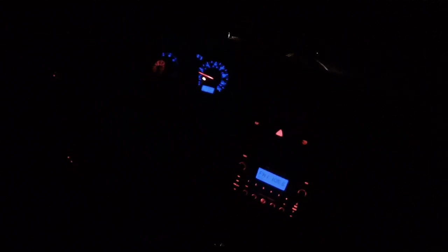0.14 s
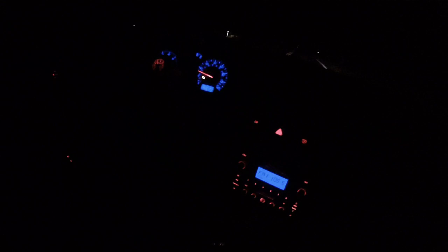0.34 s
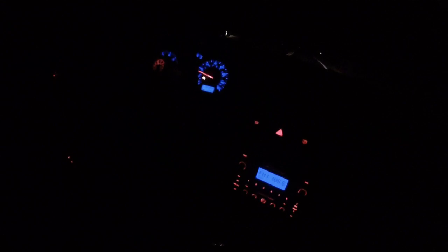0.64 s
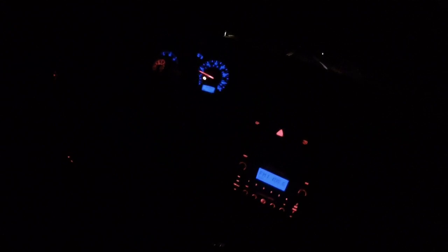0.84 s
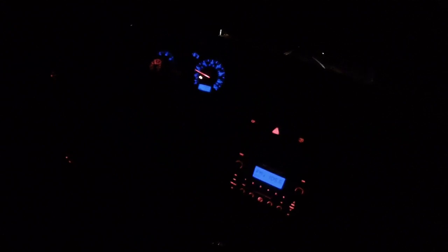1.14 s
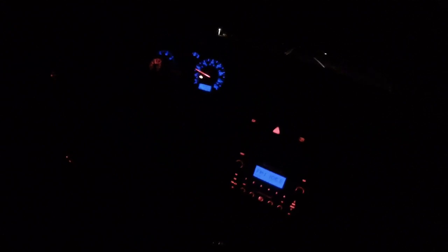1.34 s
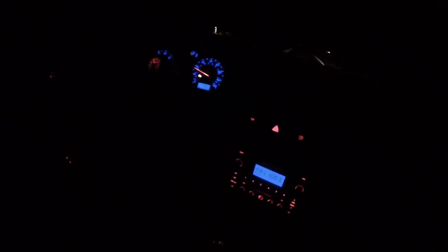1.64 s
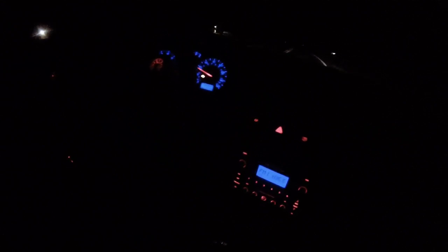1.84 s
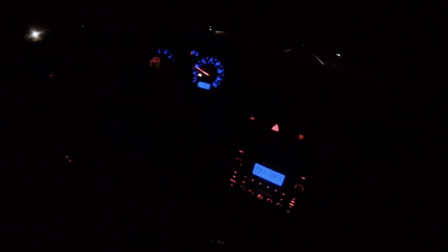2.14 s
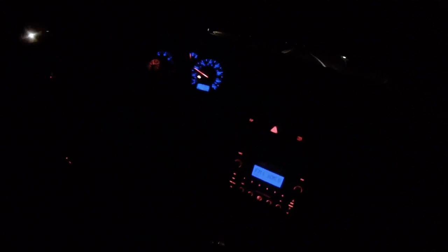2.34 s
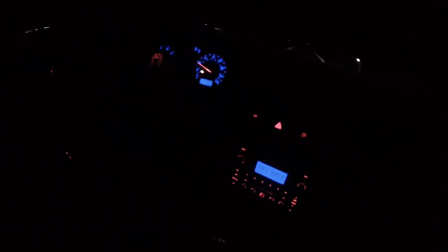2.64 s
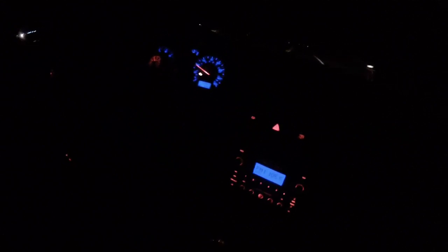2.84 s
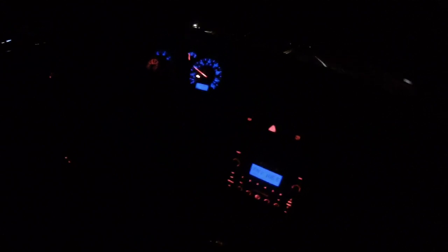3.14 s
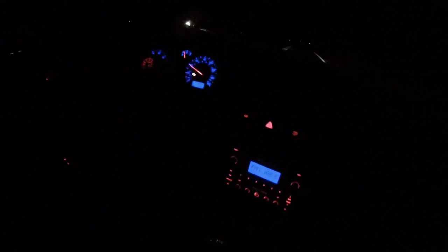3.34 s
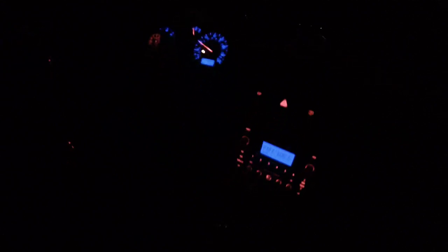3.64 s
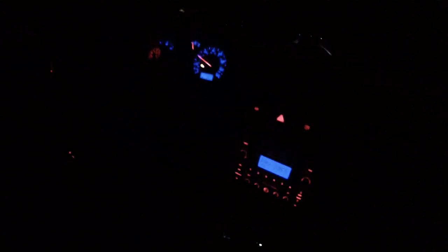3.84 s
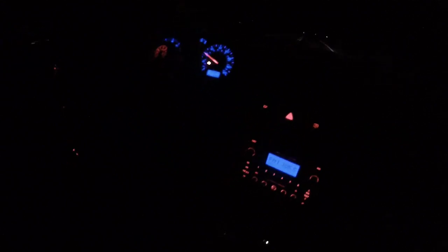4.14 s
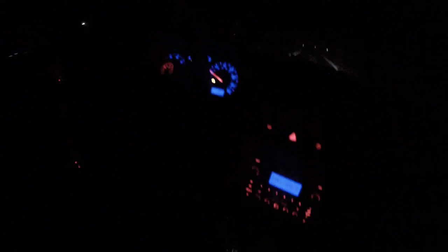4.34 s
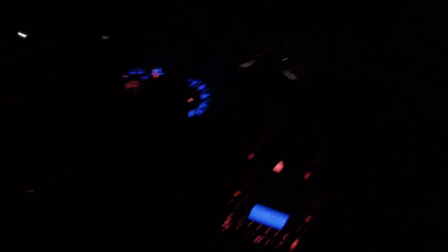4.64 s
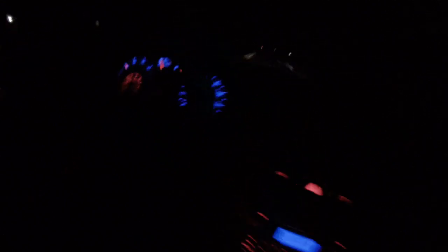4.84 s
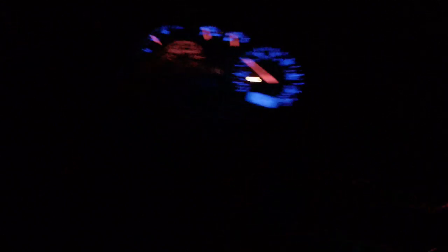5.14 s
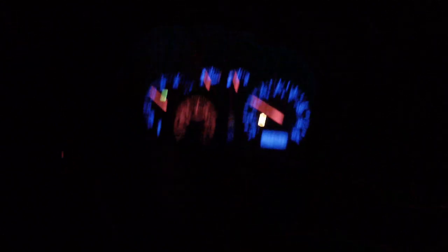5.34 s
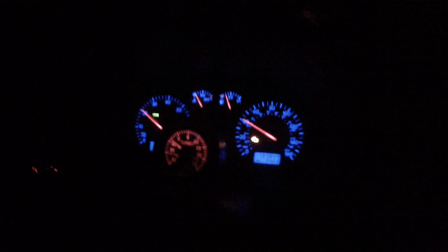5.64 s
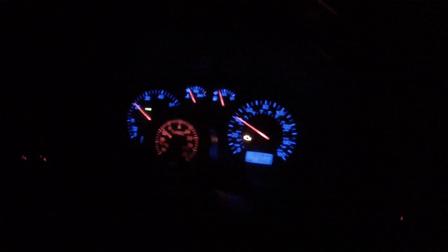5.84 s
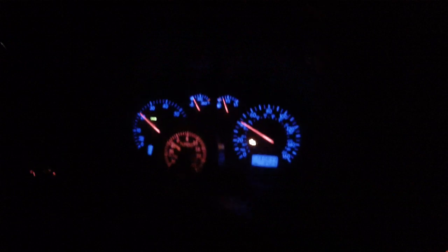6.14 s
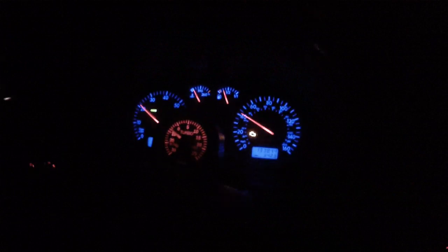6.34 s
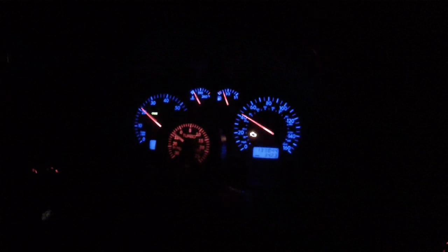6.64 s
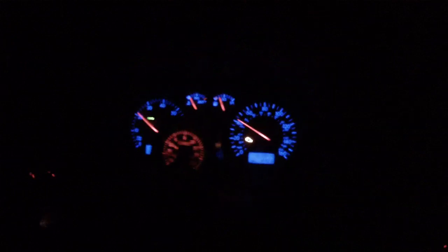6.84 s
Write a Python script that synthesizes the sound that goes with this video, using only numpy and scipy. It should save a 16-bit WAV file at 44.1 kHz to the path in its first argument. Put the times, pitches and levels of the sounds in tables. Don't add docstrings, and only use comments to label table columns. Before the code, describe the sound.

Inside a car at night, a deep booming engine climbs steadily, drops out for a gear change, then pulls again over tyre rumble and air hiss.

```python
import sys
import numpy as np
from scipy import signal
from scipy.fft import rfft, irfft
from scipy.io import wavfile
from scipy.ndimage import uniform_filter1d

SR = 44100
rng = np.random.default_rng(int(sys.argv[2]) if len(sys.argv) > 2 else 0)


def decibels_to_gain(level_db):
    exponent = np.asarray(level_db, float) / 20
    return 10 ** exponent


def store_pcm(level_fs):
    pcm = np.round(np.clip(level_fs, -1, 1) * 32767).astype(np.int16)
    wavfile.write(sys.argv[1], SR, np.atleast_2d(pcm).T)


N = 307818


def evened(x):
    return x / np.sqrt(np.mean(x ** 2) + 1e-20)


def columns(rows, t):
    s, *values = np.transpose(rows)
    return [np.interp(t, s, v) for v in values]


def read(points, hz):
    f, db = np.transpose(points)
    return np.interp(np.log(hz + 1), np.log(f + 1), db, left=-90, right=-90)


def wander(rate_hz):
    spectrum = rfft(rng.standard_normal(N))
    lowpass = 1 + (np.fft.rfftfreq(N, 1 / SR) / rate_hz) ** 2
    return evened(irfft(spectrum / lowpass, N))


def noise(colours, share, size, patchy_db):
    hop = size // 4
    hz = np.fft.rfftfreq(size, 1 / SR)
    frames = N // hop + 5
    a, b, patches = rng.standard_normal((frames, len(hz), 3)).T
    patches = uniform_filter1d(patches, size=8, axis=0)
    patches = evened(uniform_filter1d(patches, size=8, axis=1))
    mix = np.interp(np.arange(frames) * hop, np.arange(N), share * np.ones(N))
    mix = np.clip(mix, 0, 1)
    first, second = (evened(decibels_to_gain(read(c, hz)))[:, None] for c in colours)
    colour = (1 - mix) * first + mix * second
    z = (a + 1j * b) * colour * decibels_to_gain(patchy_db * patches)
    return evened(signal.istft(z, nperseg=size, noverlap=size - hop)[1][:N])


def engine(t):
    # (time [s], boom pitch [Hz], throttle [dB], exhaust pressure [dB re full])
    course = [(0, 66.1, 1.5, 0.5), (0.8, 70.25, 0, 0), (1.55, 74.96, 0, 0.5), (2.3, 79.55, -0.5, 0),
              (3.0, 84, -0.5, 0), (3.33, 85.2, 1.5, -3), (3.45, 82.5, -18, -6), (3.62, 78.4, -11, -9),
              (4.05, 66.32, -9.5, -24.5), (4.09, 66.3, -3, -7.5), (4.165, 67, -11, -4), (4.225, 73, -6, -8),
              (4.28, 68.2, -5, -6), (4.34, 68.1, -1, 0.5), (4.75, 68.2, -1, -2.5), (5.5, 70.06, -1, -5.5),
              (6.3, 71.96, -1, -3.5), (6.98, 73.6, -3, -8.5)]
    # (frequency [Hz], level [dB])
    boom_response = [(60, -13.5), (70, -11), (78, -14), (92, -17.5), (125, -6), (136, -8), (150, -13.5),
                     (180, -23)]
    # (frequency [Hz], level [dB])
    third_response = [(185, -36.5), (205, -29.5), (218, -23), (230, -25.5), (240, -34), (252, -28.5),
                      (270, -29)]
    # (frequency [Hz], gain [dB])
    cabin_lift = [(90, -3.5), (250, 3.5), (340, -5), (400, 4), (470, 4), (560, -7.5), (800, -8)]
    # (multiple of boom pitch [1], level [dB])
    upper_orders = [(1.5, -0.5), (4, 0.5), (4.5, -18.5), (5, -8), (5.5, -10.5), (6, -15), (7, -16),
                    (8, -15.5)]

    hz, throttle_db, exhaust_db = columns(course, t)
    turn = 2 * np.pi * np.cumsum(hz) / SR - 0.9
    load_db = -32 + 1.4 * throttle_db + 0.7 * exhaust_db
    orders = [
        (1, read(boom_response, hz) + throttle_db),
        (2, read(boom_response, 2 * hz) + exhaust_db),
        (3, read(third_response, 3 * hz) + throttle_db + 0.2 * exhaust_db),
    ]
    orders += [(k, load_db + db + read(cabin_lift, k * hz)) for k, db in upper_orders]

    out = 0
    for k, db in orders:
        uneven = 1 + 0.022 * np.sqrt(k) * (wander(rate_hz=6) + 1j * wander(rate_hz=6))
        lead = 1.4 * (k == 2)
        swing = (uneven * np.exp(1j * (k * turn + lead))).real
        out = out + np.sqrt(2) * decibels_to_gain(db) * swing
    return out, turn, hz


def rumble():
    # (frequency [Hz], level [dB per Hz])
    rumble_colour = [(8, -27.5), (16, -9), (24, 3.5), (34, -4), (45, -1), (70, -26.5)]
    return decibels_to_gain(-22.5) * noise([rumble_colour, rumble_colour], 0, size=8192, patchy_db=-1.5)


def drone(pace_db):
    # (frequency [Hz], level [dB per Hz])
    drone_colour = [(30, -20.5), (45, -14), (60, 0), (90, -8.5), (105, -2), (125, 3), (150, -5), (175, -10),
                    (220, -27)]
    level_db = -24 + 0.99 * pace_db
    return decibels_to_gain(level_db) * noise([drone_colour, drone_colour], 0, size=4096, patchy_db=0.7)


def roar(pace_db):
    # (frequency [Hz], level [dB per Hz])
    roar_colour = [(120, -31.5), (170, -0.5), (205, 5.5), (240, 5.5), (280, 1.5), (330, -2), (430, -2),
                   (550, -7.5), (700, -6.5), (800, -27.5), (1000, -30.5), (1500, -52)]
    return decibels_to_gain(-29 + pace_db) * noise([roar_colour, roar_colour], 0, size=2048, patchy_db=0.5)


def air(t, turn, hz, pace_db, openness):
    # (frequency [Hz], level [dB per Hz])
    shaded_colour = [(440, -29.5), (750, -3.5), (795, 0.5), (904, -16.5), (1020, -2), (1140, -11),
                     (1240, -11), (1330, -14), (1450, -10.5), (2020, -13), (2270, -14.5), (3000, -10),
                     (3500, -20.5), (4550, -56), (7700, -120)]
    # (frequency [Hz], level [dB per Hz])
    open_colour = [(440, -24), (750, -3), (785, -7), (887, -8.5), (958, -5), (1040, -12.5), (1220, -4.5),
                   (1520, -3), (1800, -6.5), (2160, -8.5), (2670, -13.5), (2870, -14), (3500, -20.5),
                   (4550, -50), (7700, -120)]
    # (frequency [Hz], level [dB per Hz])
    fizz_colour = [(2060, -32), (3500, -7), (4030, 0), (4330, -4), (4810, -4), (6000, -14.5), (7800, -47),
                   (13200, -120)]

    throb = 1 + 0.041 * np.cos(turn) + 0.067 * wander(rate_hz=10)
    hiss_db = -44.5 + 0.77 * pace_db + 3.5 * openness
    hiss = decibels_to_gain(hiss_db) * noise([shaded_colour, open_colour], openness, size=1024, patchy_db=0.6)
    fizz_db = -54 + 0.15 * pace_db + 5.5 * openness
    fizz_db = fizz_db + 0.094 * (hz - 70) - 0.6 * t
    fizz = decibels_to_gain(fizz_db) * noise([fizz_colour, fizz_colour], 0, size=512, patchy_db=0.8)
    return throb * (hiss + fizz)


def bumps(t):
    # (time [s], pitch [Hz], level [dB])
    bump_events = [(0.031, 27, -19.5), (0.53, 29, -23.5), (0.69, 28, -20), (0.9, 27, -20), (1.3, 24, -22),
                   (1.71, 26.01, -17), (1.9, 25, -18), (2.13, 25, -15), (2.27, 27.2, -14.5),
                   (2.62, 26.8, -14), (3.19, 27, -8.5), (3.33, 31.2, -17), (3.49, 29.99, -17.5),
                   (3.701, 22.6, -18), (3.88, 23, -17), (4.02, 26, -15.5), (4.68, 28, -16), (4.9, 27, -17),
                   (5.13, 27.5, -20), (5.41, 27.96, -17), (5.55, 23, -14), (5.71, 22, -12.5),
                   (6.0, 25, -13), (6.32, 29.02, -14.5), (6.45, 28, -15), (6.58, 26.99, -16),
                   (6.69, 24.9, -14), (6.82, 25, -18)]
    rise_s, fall_s = 0.06, 0.083
    out = np.zeros(N)
    sway = 0.4 * wander(rate_hz=10)
    for s, hz, db in bump_events:
        near = slice(max(round((s - 0.3) * SR), 0), round((s + 0.4) * SR))
        since = t[near] - s
        u = since / np.where(since < 0, rise_s, fall_s)
        swing = np.cos(2 * np.pi * hz * since + sway[near])
        out[near] += np.sqrt(2) * decibels_to_gain(db) * np.exp(-u ** 2) * swing
    return out


def road(t, turn, hz):
    # (time [s], road pace [dB re start], microphone facing the open air [0-1])
    drive = [
        (0, -0.5, 0),
        (1.0, 1, 0.14),
        (2.4, 4, 0.04),
        (3.2, 4, .1),
        (4.1, 2, .2),
        (4.6, 3, 0.4),
        (5.1, 2.5, 0.8),
        (5.6, 2.5, .8),
        (6.3, 4, .8),
        (6.98, 4, 0.7),
    ]
    pace_db, openness = columns(drive, t)
    low = rumble() + drone(pace_db) + bumps(t)
    return low + roar(pace_db) + air(t, turn, hz, pace_db, openness)


def crickets():
    # (time [s], length [s], first pitch [Hz], level [dB])
    chirps = [(0.82, 0.2, 5680, -64), (0.83, 0.16, 5490, -63), (0.97, 0.1, 5200, -64),
              (1.04, 0.14, 5470, -63), (1.283, 0.1, 5640, -64), (1.436, 0.02, 5600, -61),
              (1.6, 0.3, 5640, -68), (6.465, 0.062, 5560, -61), (6.541, 0.019, 5540, -60),
              (6.56, 0.038, 5520, -53), (6.598, 0.058, 5500, -58), (6.582, 0.06, 5300, -57)]
    pulses_per_s, sink_hz_per_s = 52, 300
    out = np.zeros(N)
    blur = 0.7 * wander(rate_hz=40)
    for s, length, hz, db in chirps:
        t = np.arange(round(length * SR)) / SR
        at = round(s * SR)
        phase = 2 * np.pi * np.cumsum(hz - sink_hz_per_s * t) / SR
        tone = np.sin(phase + blur[at:at + len(t)])
        pulses = np.sin(np.pi * pulses_per_s * t) ** 2
        out[at:at + len(t)] += decibels_to_gain(db) * evened(tone * pulses)
    return out


def trim():
    # (time [s], length [s], ring pitch [Hz], ring width [Hz], level [dB])
    buzz_events = [(1.175, 0.035, 3000, 150, -49), (1.265, 0.055, 3960, 110, -55),
                   (1.36, 0.06, 4030, 100, -63), (1.43, 0.045, 4100, 200, -53),
                   (1.42, 0.055, 2950, 300, -51), (3.845, 0.0012, 5000, 450, -40),
                   (4.68, 0.06, 3900, 500, -55), (4.982, 0.04, 3820, 170, -43),
                   (5.024, 0.024, 4020, 180, -44), (5.045, 0.047, 3850, 150, -43),
                   (4.972, 0.04, 2850, 200, -46), (5.03, 0.038, 2850, 150, -44),
                   (4.985, 0.095, 2250, 400, -48), (4.98, 0.1, 1450, 700, -41),
                   (4.98, 0.11, 4700, 800, -52), (6.305, 0.03, 4000, 300, -53),
                   (6.58, 0.03, 3950, 200, -53), (6.76, 0.03, 4000, 500, -54)]
    throbs_per_s = 36
    out = np.zeros(N)
    t = np.arange(1500) / SR
    for s, length, hz, width, db in buzz_events:
        at = round(s * SR)
        rub = rng.standard_normal(round(length * SR))
        rub = rub * (1 + np.sin(np.pi * throbs_per_s * np.arange(len(rub)) / SR) ** 2)
        ring = t * np.exp(-2 * np.pi * width * t) * np.sin(2 * np.pi * hz * t)
        buzz = signal.fftconvolve(rub, ring)
        level = decibels_to_gain(db) * np.sqrt(len(rub) / np.sum(buzz ** 2))
        out[at:at + len(buzz)] += level * buzz
    return out


def scene():
    t = np.arange(N) / SR
    boom, turn, hz = engine(t)
    return (boom + road(t, turn, hz) + crickets() + trim())[None]


def low_pass(x):
    return signal.sosfilt(signal.butter(12, 15920, fs=SR, output="sos"), x)


def record(dry):
    slow = signal.resample_poly(dry, 40, 147, axis=1, padtype="edge")
    slow = np.clip(slow, -1, 1)
    held = np.repeat(slow, 4, axis=1)
    held = signal.resample_poly(held, 147, 160, axis=1, padtype="edge")[:, :N]
    lowpass = signal.ellip(10, 0.1, 50, 15300, fs=SR, output="sos")
    band = signal.sosfiltfilt(lowpass, held)
    return low_pass(np.clip(band, -1, 1))


dry = scene()
out = record(dry)
store_pcm(out)
```